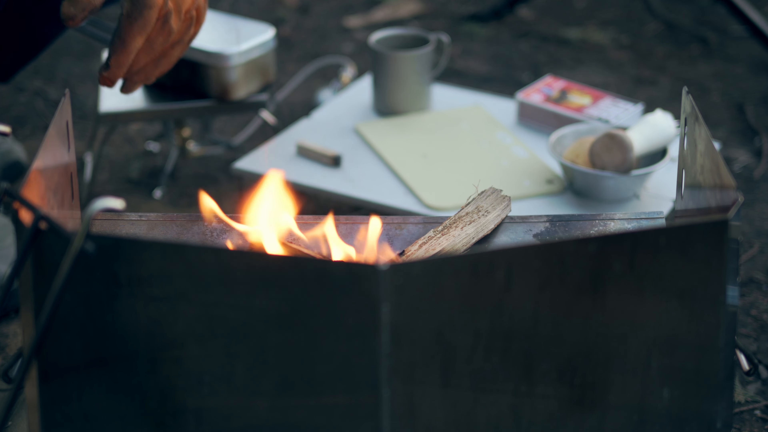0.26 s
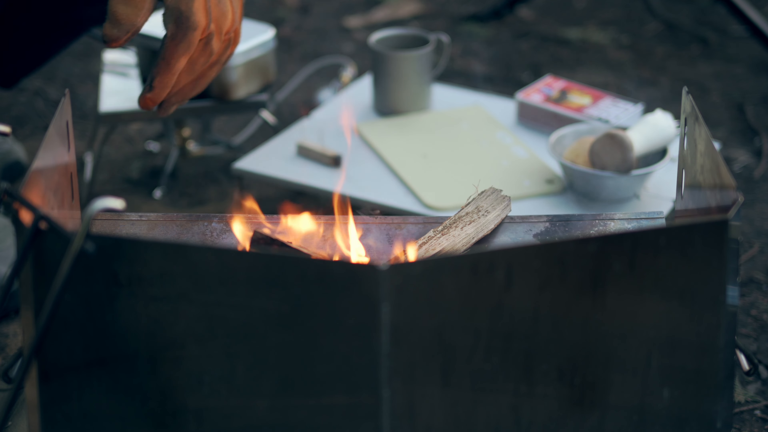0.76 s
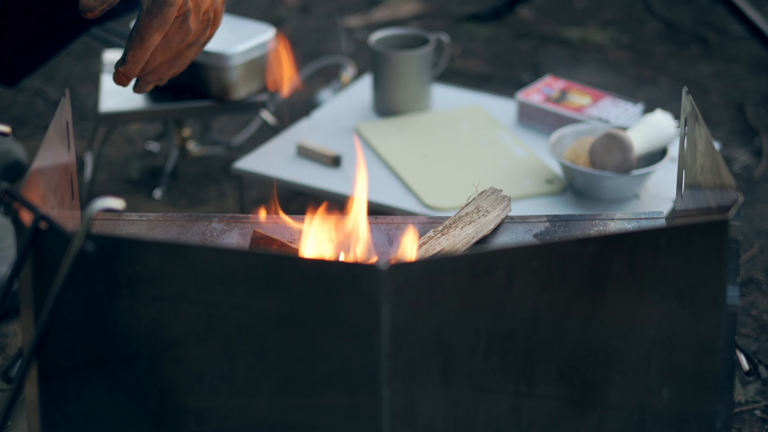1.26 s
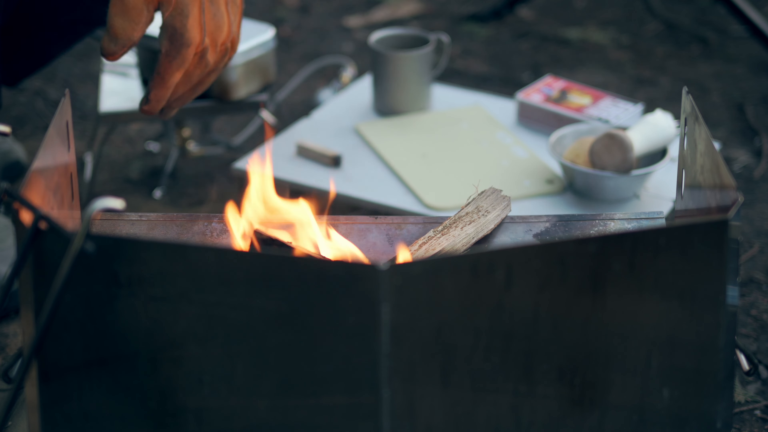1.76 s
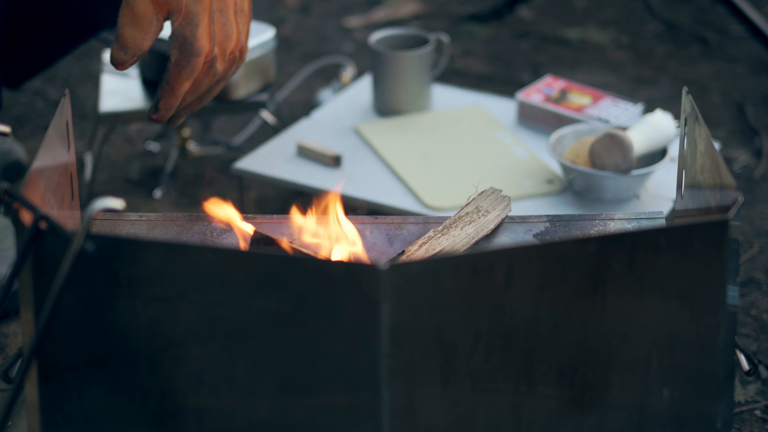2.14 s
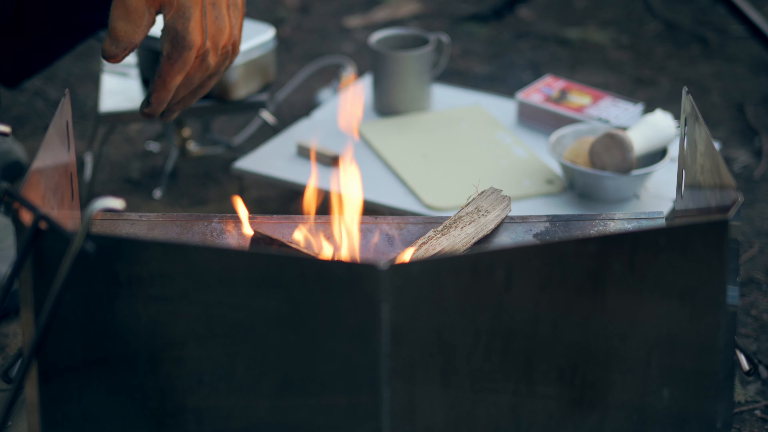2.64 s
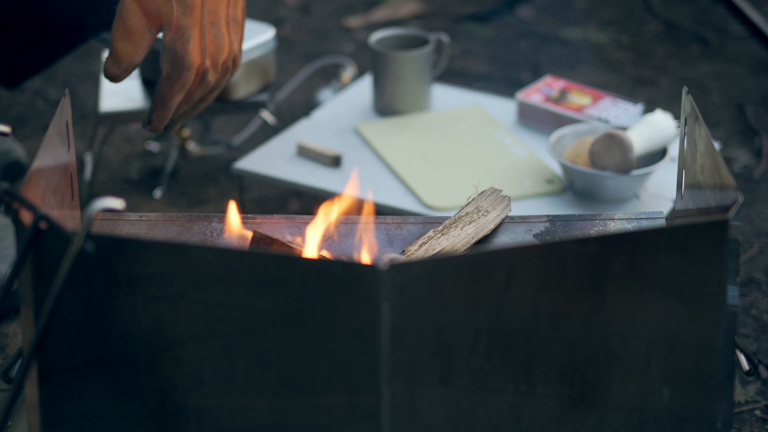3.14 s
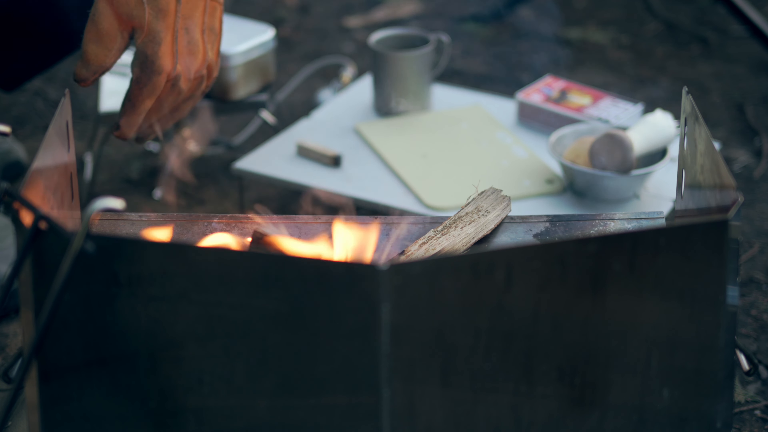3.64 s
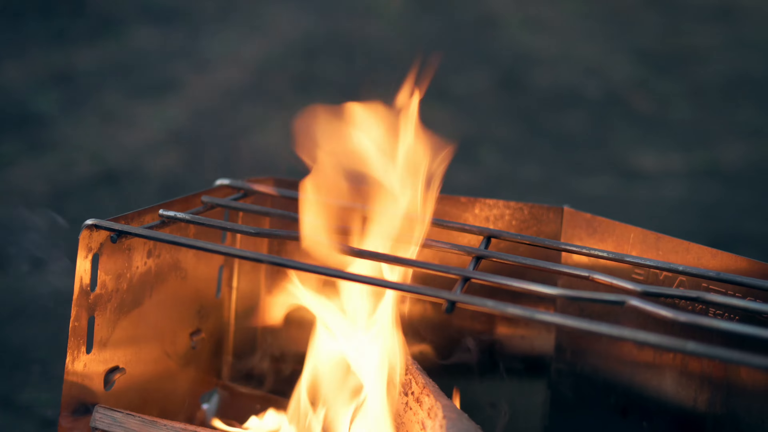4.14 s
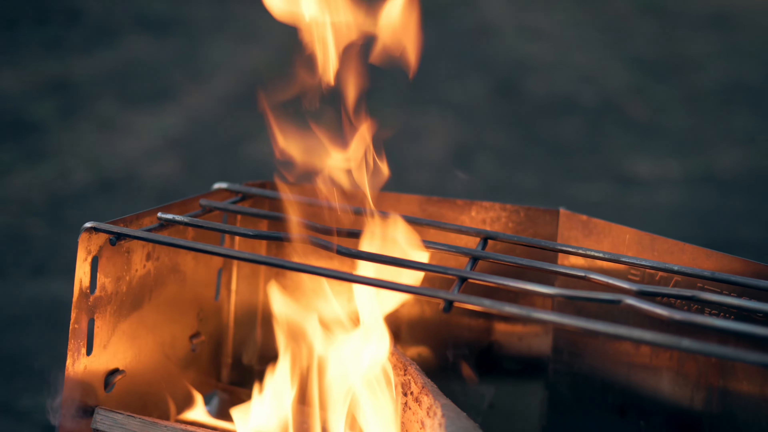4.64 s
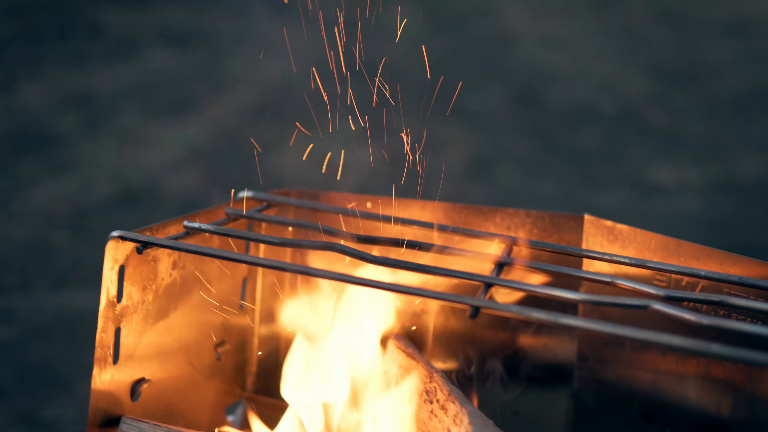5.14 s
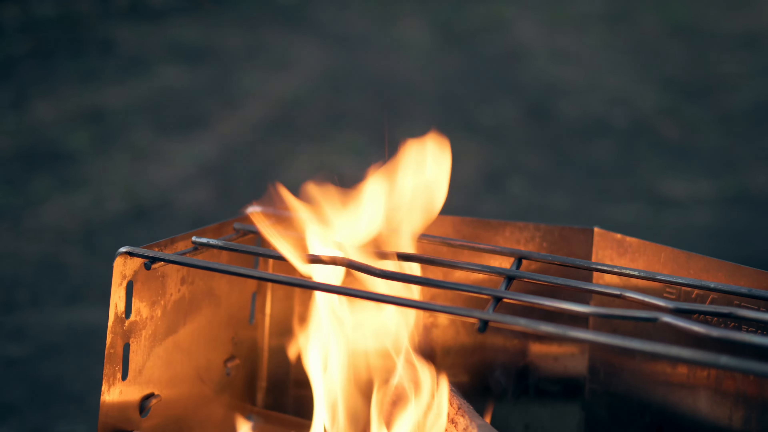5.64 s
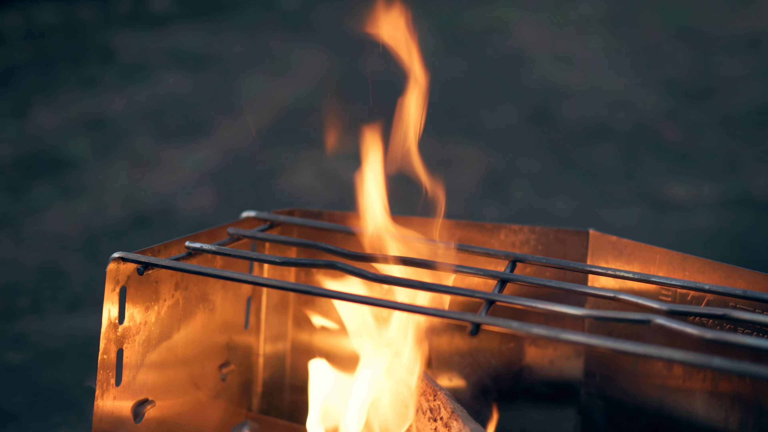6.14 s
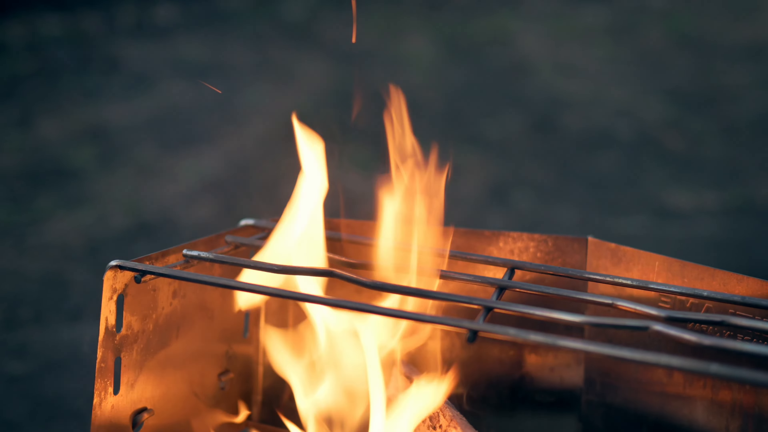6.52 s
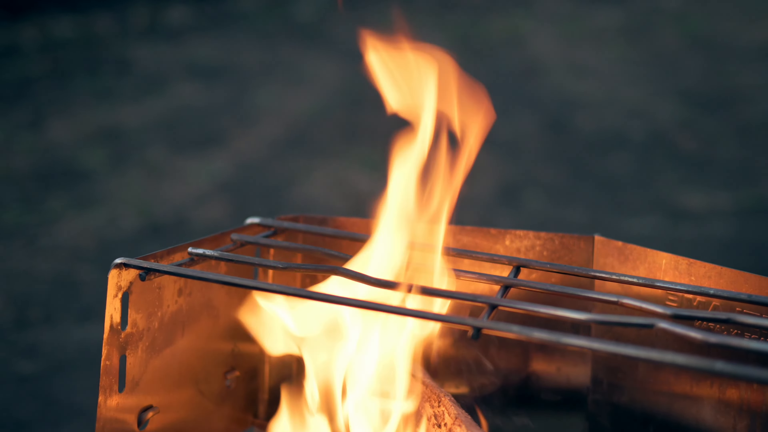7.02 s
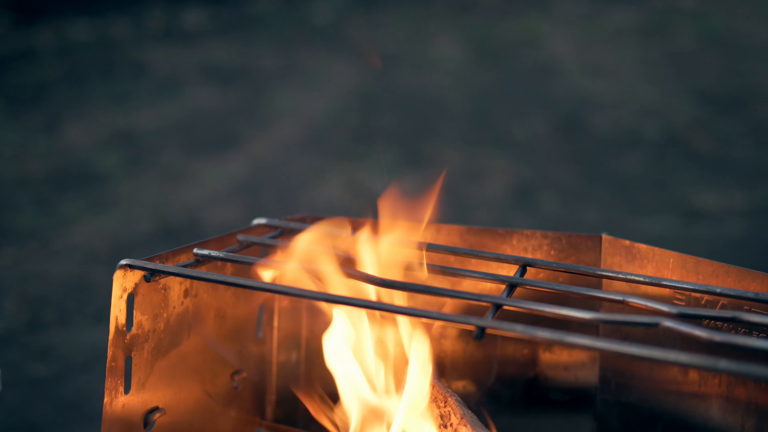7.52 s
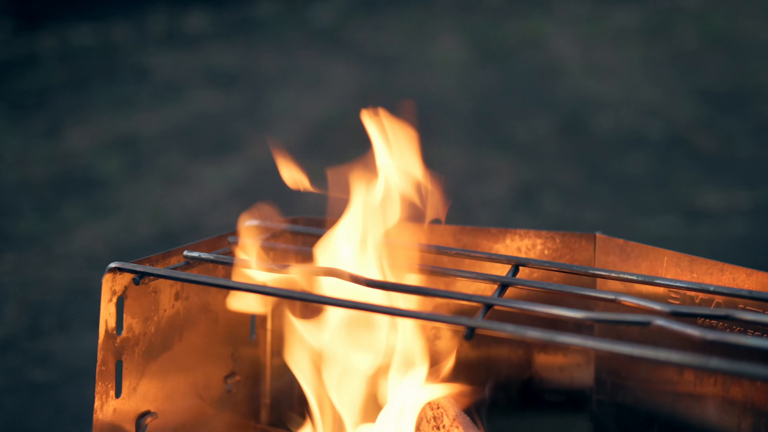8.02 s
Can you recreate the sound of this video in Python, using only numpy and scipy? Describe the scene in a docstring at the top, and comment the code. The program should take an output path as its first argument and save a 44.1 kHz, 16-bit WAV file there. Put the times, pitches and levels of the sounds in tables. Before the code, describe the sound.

Outdoors, very close, nearly centred. From 0 to 3.76 s, a hand stirs small hard pieces in a metal tin over soft, quiet air. Irregular strokes give gritty rattles and short tinny rings, with stronger knocks at 0.03, 1.39 and 1.8 s. After sparser single blows from 2.0 to 2.6 s, a huge clipped clang lands at 2.72 s; smaller clinks and rattle follow around 3.0-3.3 s, then near quiet. At 3.8 s it cuts to a fuller fire: a flickering hiss with fluttering treble and small low puffs. Dry pops with spark spray and stove ring come at 4.44, 4.94 (loudest), 5.15, 5.53, 5.94 and 6.67 s. A faint distant motor hum wavers, dipping near 5.4 s and fading toward the end. Throbbing, raspy insect chirps repeat about three times a second until 7.85 s, slowly weakening. Fire continues to about 8.3 s.

```python
"""A sheet-metal camp stove outdoors, heard close by at two moments.
First a hand stirs small hard things in a tin over quiet air: ringing blows and a rattle of many collisions.
At 3.8 s the grown fire takes over: its hiss is noise flickering band by band, and a far motor hums as two tones.
An insect chirps in throbbing noise, the flame puffs in short low flutters, and sap pockets
burst with a dry snap, a spray of sparks and the ring of the stove."""
import sys
import numpy as np
from scipy import signal
from scipy.fft import rfft, irfft, next_fast_len
from scipy.io import wavfile
from scipy.ndimage import uniform_filter1d

SR = 44100
rng = np.random.default_rng(int(sys.argv[2]) if len(sys.argv) > 2 else 0)


def dump_mix(stems):
    """Bounce the given channels to the path in sys.argv[1] as a 16-bit WAV at rate SR."""
    frames = np.atleast_2d(stems).T  # one column per channel
    limited = np.clip(frames, -1, 1)  # hard clip at full scale
    pcm = np.round(limited * 32767).astype(np.int16)
    wavfile.write(sys.argv[1], SR, pcm)


N = 365148
T = np.arange(N) / SR
FIRE_FADE_IN_S = (3.764, 3.8)  # start and end

# ringing modes of the tin: (frequency [Hz], relative level [dB], ring t60 before damping [s])
TIN_MODES = [(544, -24.5, 0.19), (1022, -27.5, 0.028), (1347, -14.5, 0.045), (1525, -12.5, 0.058),
             (2490, -27, 0.22), (2920, -12.5, 0.082), (3872, -5, 0.028), (3950, -19, 0.14)]


def undb(db):
    """Amplitude from decibels."""
    return 10 ** (np.asarray(db) / 20)


def level(x, db):
    """Scale x to an RMS level in dB."""
    return x * undb(db) / np.sqrt(np.mean(x ** 2))


def peak(x, db):
    """Scale x to a peak level in dB."""
    return x * undb(db) / np.abs(x).max()


def colour(x, points):
    """Shape x by (frequency [Hz], level [dB]) points with a causal response from the folded cepstrum."""
    hz, db = np.transpose(points)
    log_grid = np.log(np.linspace(1, SR / 2, 2049))
    cepstrum = irfft(np.interp(log_grid, np.log(hz), db) * np.log(10) / 20)
    cepstrum[1:2048] *= 2
    cepstrum[2049:] = 0
    response = irfft(np.exp(rfft(cepstrum)))
    return signal.fftconvolve(x, response)[:len(x)]


def band(x, lo_hz, hi_hz):
    """Band-pass x between two edges."""
    edges = [lo_hz, min(hi_hz, .45 * SR)]
    return signal.sosfilt(signal.butter(2, edges, "bandpass", fs=SR, output="sos"), x)


def walk(rate):
    """Random levels held 1 / rate s and slewed twice; spread near 1."""
    t = T[::64]
    hold = int(SR / 64 / rate)
    steps = np.repeat(rng.standard_normal(len(t) // hold + 1), hold)
    slewed = uniform_filter1d(uniform_filter1d(steps, hold), hold)
    return 1.3 * np.interp(T, t, slewed[:len(t)])


def fade(t, t60):
    """Exponential decay by 60 dB in t60 s, never shorter than 2 ms."""
    return np.exp(-np.log(1000) * t / max(t60, .002))


def add(out, s, sound):
    """Mix a sound into out from time s."""
    i = int(s * SR)
    out[i:i + len(sound)] += sound[:len(out) - i]


def flickering_noise(points, db, flicker_db, flutter_db, step_oct):
    """Coloured noise whose bands flicker alone; the treble bands also flutter together."""
    base = colour(rng.standard_normal(N), points)
    flutter = walk(28) + walk(50)
    size = 2 * next_fast_len(N // 2 + 1)
    spectrum = rfft(base, size)
    # place of each frequency, in bands above 150 Hz
    place = np.log2(np.linspace(1, SR / 2, size // 2 + 1) / 150) / step_oct
    top = int(6.8 / step_oct)
    out = 0
    for k in range(top + 1):
        # neighbouring bands crossfade
        share = np.clip(1 - np.abs(np.clip(place, 0, top) - k), 0, 1)
        gain_db = flicker_db * (walk(14) + walk(40)) + flutter_db * (k / top) ** 4 * flutter
        out = out + irfft(spectrum * share)[:N] * undb(gain_db)
    return level(out, db)


def side_noise():
    """Steady coloured noise, opposite in the two channels."""
    # spectrum: (frequency [Hz], relative level [dB])
    noise_colour = [ (1000, -6), (2000, -40), (16000, 2.5)]
    return level(colour(rng.standard_normal(N), noise_colour), -57)


def quiet_air():
    """Outdoor air as soft noise that flickers slightly in wide bands."""
    # spectrum: (frequency [Hz], relative level [dB])
    air_colour = [(25, -27), (60, -5.5), (150, 0.5), (400, -9), (3800, -11.5), (4600, -18), (16000, -22)]
    return flickering_noise(air_colour, -49.5, flicker_db=.8, flutter_db=.5, step_oct=2.)


def motor_hum():
    """Two wavering motor tones an octave apart."""
    # course of the tones: (time [s], upper tone RMS before wavering [dB], lower tone RMS [dB])
    tone_levels = [(3.7, -53, -69), (4.1, -48.5, -76), (5.4, -65, -58), (5.7, -54, -54.5), (6.5, -48, -61),
                   (7.3, -52, -62), (8.28, -72, -67)]
    upper_hz = 160  # before a slight random wander
    s, upper_db, lower_db = np.transpose(tone_levels)
    # phase of the lower, 80 Hz tone; twice this is the upper tone
    turn = np.pi * np.cumsum(upper_hz * (1 + 0.006 * walk(3.9))) / SR
    upper = undb(np.interp(T, s, upper_db) + 1.6 * walk(9)) * np.sin(2 * turn)
    lower = undb(np.interp(T, s, lower_db)) * np.sin(turn)
    return np.sqrt(2) * (upper + lower)


def insect():
    """Each chirp is a throbbing rasp that starts sharply and dies away; the insect tires slowly."""
    # chirp starts: time [s]
    chirp_starts = [3.846, 4.2412, 4.595, 4.917, 5.2384, 5.57, 5.903, 6.282, 6.676, 7.0678, 7.481, 7.848]
    centre_hz, width_hz = 4800, 1800
    chirp_s, throbs_per_s = 0.11, 52.6
    first_db, tires_db_s = -44.5, -0.7  # rasp RMS before the throb
    out, t = np.zeros(N), T[:int(.25 * SR)]
    edges = centre_hz - width_hz / 2, centre_hz + width_hz / 2
    throb = (1 + .5 * np.cos(2 * np.pi * throbs_per_s * t)) * np.exp(-(t / chirp_s) ** 2)
    for s in chirp_starts:
        rasp = band(band(rng.standard_normal(len(t)), *edges), *edges)
        add(out, s, level(rasp, first_db + tires_db_s * (s - chirp_starts[0])) * throb)
    return out


def fire_hiss():
    """The grown fire's hiss: noise flickering in narrow bands, with a strong flutter in the treble."""
    # spectrum: (frequency [Hz], relative level [dB])
    fire_colour = [(25, -36), (66, -4), (250, -8), (373, -17.5), (1020, -16), (1840, -9.5), (2410, -13),
                   (2900, -9), (3900, -8.5), (4400, -19.5), (7000, -15), (9000, -17), (16000, -13.5)]
    return flickering_noise(fire_colour, -38, flicker_db=1.4, flutter_db=2.6, step_oct=.25)


def puffs():
    """Short low flutters of the flame sheet: the loudest listed, smaller ones at random."""
    # the flame flaps: (time [s], noise peak [dB], pitch [Hz])
    loud_puffs = [(5.184, -36, 100), (5.418, -35, 188), (6.232, -37.5, 161), (6.99, -37, 173),
                  (8.051, -37, 104)]
    small_per_s, small_db = 9, -47  # lowest level of the random spread
    out, t = np.zeros(N), T[:int(.1 * SR)]
    start = FIRE_FADE_IN_S[1]
    span = T[-1] - start
    chance = rng.random((int(small_per_s * span), 3))
    # small puffs spread upward from the lowest level by up to 3.7 dB
    small = [(start + span * a, small_db + 3.7 * b, 90 * 3.84 ** c) for a, b, c in chance]
    for s, db, hz in loud_puffs + small:
        rush = band(rng.standard_normal(len(t)) * t * fade(t, 0.058), 130, 570)
        flap = np.sin(2 * np.pi * hz * t) * t * fade(t, 0.035)
        add(out, s, peak(rush, db) + peak(flap, db - 1))
    return out


def clang(modes, pitch, spread_oct, stretch, t):
    """A metal body's modes, most those near the pitch of the blow; loose contact keeps every mode wavering."""
    hz, mode_db, t60 = np.transpose(modes)
    chance = rng.standard_normal((2, len(hz)))
    near = undb(mode_db + 2 * chance[0] - 6 * np.abs(np.log2(hz / pitch)) / spread_oct)
    drift = uniform_filter1d(rng.standard_normal((len(hz), len(t))), size=250, axis=1)
    waver = 1 + 10 * np.minimum(t / 0.025, 1) * drift
    tones = np.sin(2 * np.pi * np.outer(hz * (1 + 0.0026 * chance[1]), t))
    decay = np.exp(-np.log(1000) * t / (stretch * t60[:, None]))
    return near @ (waver * tones * decay)


def pops():
    """Sap pockets burst: a dry snap, then a spray of sparks and the ring of the stove."""
    # bursts: (time [s], snap peak [dB], snap centre [Hz], aftersound peak [dB],
    #          stove pitch most excited [Hz], spray t60 [s])
    bursts = [(4.44, -9.5, 7160, -23, 3700, 0.16), (4.938, -3.5, 6100, -12.5, 716, 0.088),
              (5.154, -21.5, 3200, -20.5, 3400, 0.025), (5.526, -33, 5000, -26, 2100, 0.16),
              (5.937, -17, 5600, -37, 4100, .015), (6.666, -17.5, 6900, -17, 1950, 0.3)]
    # ringing modes of the stove: (frequency [Hz], relative level [dB], ring t60 before stretching [s])
    stove_modes = [(639, -2, 0.23), (713, 3.5, 0.13), (1450, 7, 0.11), (1880, 4.5, 0.24), (2110, 4.5, 0.2),
                   (3620, 18, 0.05)]
    out, t = np.zeros(N), T[:int(.28 * SR)]
    for s, snap_db, snap_hz, after_db, pitch, spray in bursts:
        noise = rng.standard_normal((2, len(t)))
        # louder snaps cover a wider band
        wide = 1.53 + 5.3 * undb(2 * snap_db)
        burst = noise[0] * t * fade(t, 0.0027)
        snap = peak(band(burst, snap_hz / wide, snap_hz * wide), 0) + peak(band(burst, 1800, 21000), -26)
        sparks = band(noise[1] * fade(t, spray), 320, 5300)
        # a longer spray goes with a longer ring
        ring = clang(stove_modes, pitch, 0.77, np.clip(spray / 0.054, .2, 1.5), t)
        ring = ring * (1.34 + fade(t, spray))
        after = peak(sparks, -1.4) + peak(ring, -1.5)
        add(out, s, peak(snap, snap_db) + peak(after, after_db))
    return out


def grains(smear_s):
    """Envelope of tiny collisions at random moments, a few much larger, each a short burst of grit."""
    per_s, scatter_db = 500, 3.
    struck = rng.random(N) < per_s / SR
    hits = struck * undb(scatter_db * np.minimum(rng.exponential(size=N), 5))
    # each burst's power falls to 1/e in smear_s
    return np.sqrt(signal.lfilter([1], [1, -np.exp(-1 / (smear_s * SR))], hits ** 2))


def stirring(hz):
    """Gain of the rattle at one pitch: each stroke rises, holds and falls, then the pieces settle."""
    # strokes of the hand through the pieces:
    # (time [s], length [s], level at 2500 Hz [dB], brightness [dB per octave])
    strokes = [(0, 0.041, -33.5, 0.5), (0.071, 0.14, -44, 2), (0.227, 0.0041, -34.5, 1),
               (0.405, 0.054, -38.5, 1.5), (0.501, 0.01, -34, 1), (0.533, 0.0039, -28.5, 1.5),
               (0.558, 0.024, -34.5, 0), (0.64, 0.021, -30, 2), (0.7, 0.048, -38.5, -0.5),
               (0.917, 0.12, -41.5, 1.5), (1.053, 0.021, -31.5, 0), (1.321, 0.14, -42, 2),
               (1.366, 0.032, -32, 0), (1.759, 0.0039, -35.5, -2), (1.849, 0.031, -34.5, 1),
               (1.939, 0.066, -31.5, 0), (2.764, 0.07, -36.5, 1), (3.034, 0.051, -45, 2.5),
               (3.165, 0.032, -32, 2), (3.232, 0.082, -34.5, 1.5)]
    rise_db_s, fall_db_s = 1204, 798
    settle_db, settle_fall_db_s = -14, 42.5  # the pieces go on sliding, more softly
    t = T[:4 * SR:128]
    s, length, db, bright_db = np.transpose(strokes)[:, :, None]
    early, late = np.maximum(s - t, 0), np.maximum(t - s - length, 0)
    # doubled decibels give power
    fall = undb(-2 * fall_db_s * late) + undb(2 * (settle_db - settle_fall_db_s * late))
    power = undb(2 * (db + bright_db * np.log2(hz / 2500) - rise_db_s * early)) * fall
    return np.interp(T, t, np.sqrt(power.sum(axis=0)), right=0)


def rattle():
    """Pieces of every size collide, each size in its own octave; broad clashes join them and ring the tin."""
    # spectrum of the collisions: (frequency [Hz], relative level [dB])
    rattle_colour = [(90, -29.5), (450, -7.5), (1300, -4.5), (3000, -3.5), (4000, 2.5), (4800, -15),
                     (9000, -14), (15000, -42)]
    ring_db, turns_db = -5.5, 4.  # tin's ring against the grit; spread of its changing modes
    clash, noise = grains(0.0005), rng.standard_normal(N)
    toned = colour(noise, rattle_colour)
    sizes_hz = 180 * 2. ** np.arange(7)
    grit = []
    for hz in sizes_hz:
        # smaller pieces are higher and die faster
        hits = toned * (.8 * clash + grains(3. / hz + .001))
        grit.append(band(hits, hz / 1.41, hz * 1.41) * undb(1.2 * walk(30)))
    rings = []
    for hz, db, t60 in TIN_MODES:
        # the rattle halves the ring time and evens out the modes
        r = fade(1 / SR, .5 * t60)
        ring = signal.lfilter([1], [1, -2 * r * np.cos(2 * np.pi * hz / SR), r * r], clash * noise)
        # every mode is caught by turns as the pieces move about
        rings.append(undb(0.17 * db + turns_db * walk(25.)) * level(ring, 0))
    stirred_grit = sum(g * stirring(hz) for g, hz in zip(grit, sizes_hz)) / np.std(sum(grit))
    stirred_rings = sum(g * stirring(m[0]) for g, m in zip(rings, TIN_MODES)) / np.std(sum(rings))
    return stirred_grit + undb(ring_db) * stirred_rings


def knocks():
    """Each blow: a crack, gritty contact, a thud, the piece's own note and the tin's ring."""
    # knocks in the tin: (time [s], peak without crack and thud [dB], pitch of the struck piece [Hz],
    #                     treble crack against that peak [dB], ring t60 of the piece [s])
    blows = [(0.032, -11, 2280, -14, 0.014), (0.32, -17, 4000, -15, 0.011), (0.334, -21, 3130, -1, 0.07),
             (0.4, -21.5, 3780, -1, 0.025), (0.486, -24.5, 1445, -14, 0.18), (0.743, -20, 2030, -21, 0.03),
             (0.766, -21, 750, -32, 0.033), (1.052, -19.5, 2200, -23, 0.045),
             (1.076, -18.5, 3270, -36, 0.017), (1.259, -28.5, 4100, 3, 0.0099),
             (1.308, -23.5, 3700, -7, 0.035), (1.392, -8.5, 2780, -15, 0.03),
             (1.447, -22.5, 2800, -10, 0.019), (1.801, -10, 1016, -26, 0.071),
             (1.8035, -12, 1560, -25, 0.054), (1.816, -24, 3850, -13, 0.06),
             (1.823, -16.5, 1360, -20, 0.047), (1.937, -18, 4020, -20, 0.036),
             (1.95, -19, 1600, -0.5, 0.015), (2.002, -13, 3240, -31, 0.012), (2.018, -18, 2160, -17, 0.059),
             (2.063, -18.5, 3120, -4, 0.043), (2.246, -13.5, 3170, -24, 0.029),
             (2.395, -27.5, 3400, -28, 0.021), (2.589, -16, 3240, -17, 0.024),
             (2.723, 8, 972, -14.5, 0.078), (2.73, 2, 3740, -27, 0.031), (2.7463, -2, 2560, -24, 0.04),
             (2.79, -15.5, 1150, -1.5, 0.055), (2.859, -24.5, 563, -8, 0.16),
             (2.866, -21.5, 4000, -22, 0.042), (3.164, -20.5, 1040, -20, 0.049),
             (3.191, -20.5, 1537, -3, 0.13), (3.253, -20, 3120, 2, 0.059), (3.298, -21.5, 1533, -8, 0.14),
             (3.312, -23.5, 3700, 5, 0.025)]
    out, t = np.zeros(N), T[:int(.28 * SR)]
    for s, db, pitch, crack_db, ring in blows:
        noise = rng.standard_normal((3, len(t)))
        waver = 1 + 4 * uniform_filter1d(noise[2], size=60)
        piece = np.sin(2 * np.pi * pitch * t) * fade(t, ring) * waver
        grit = peak(band(noise[0] * fade(t, ring), min(pitch / 1.4, 1100), pitch + 1800), -6.5)
        # a piece that rings longer damps the tin less
        body = clang(TIN_MODES, pitch, 3., np.clip(ring / 0.055, .2, 1.5), t)
        crack = peak(band(noise[1] * fade(t, 0.0061 + 0.18 * ring), 3500, 9000), crack_db)
        thud = peak(band(band(noise[1] * fade(t, 0.062), 137.4, 320), 137.4, 320), -27.5)
        # higher notes are weaker
        blow = peak(piece, -1.5 - 2.2 * pitch / 1000) + grit + peak(body, -3.5)
        add(out, s, peak(blow, db) + undb(db) * (crack + thud))
    return out


def scene():
    """The stirred tin over quiet air, then the fire, motor and insect, in two channels."""
    port_lag = 0.024  # samples; each channel is this much early or late
    later = np.interp(T, FIRE_FADE_IN_S, (0, 1))
    hits = band(knocks(), 125, 20000) + rattle() + pops()
    background = (1 - later) * quiet_air() + later * (fire_hiss() + motor_hum())
    steady = background + puffs() + insect()
    # sharp sounds from one side reach the two ports a little apart
    side = side_noise() + port_lag * np.gradient(hits)
    return hits + steady + side * np.array([[1], [-1]])


def record(dry):
    """The loudest knocks clip; the deepest bass rolls off and the top is cut steeply."""
    top_hz = 15700
    clipped = np.clip(dry, -.97, .97)
    no_rumble = signal.sosfilt(signal.butter(2, 35, "highpass", fs=SR, output="sos"), clipped)
    return signal.sosfilt(signal.ellip(10, .2, 60, top_hz, fs=SR, output="sos"), no_rumble)


dry = scene()
out = record(dry)
dump_mix(out)
```